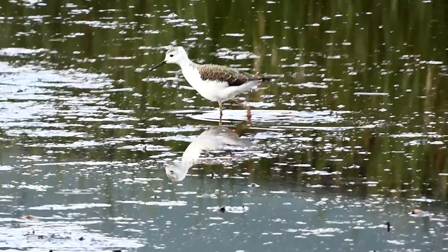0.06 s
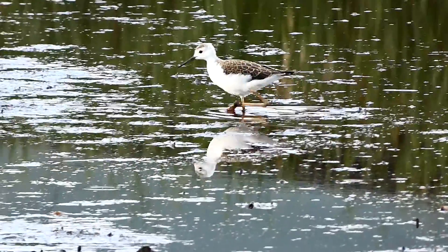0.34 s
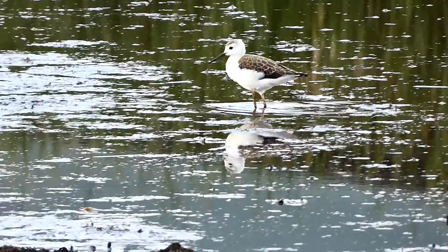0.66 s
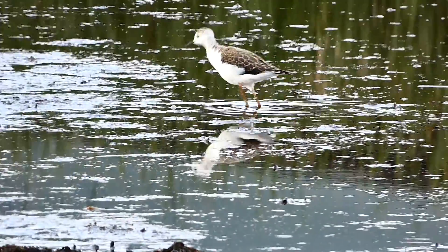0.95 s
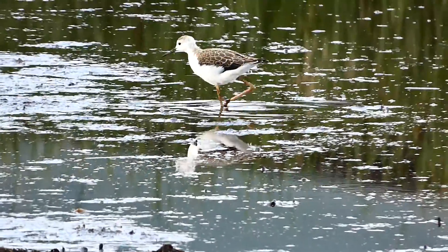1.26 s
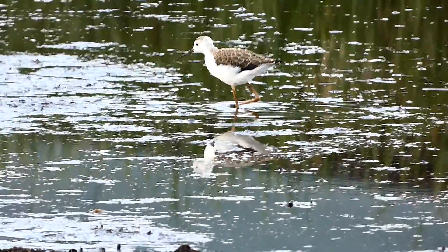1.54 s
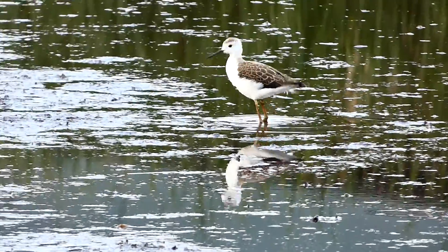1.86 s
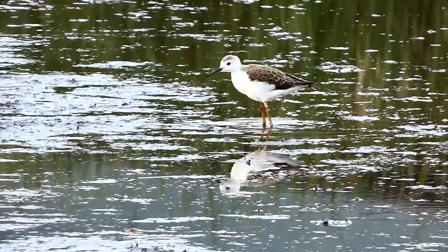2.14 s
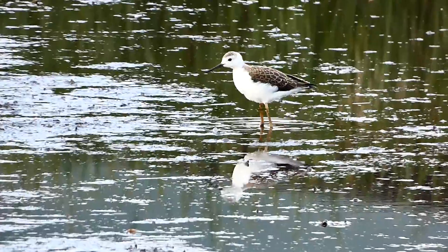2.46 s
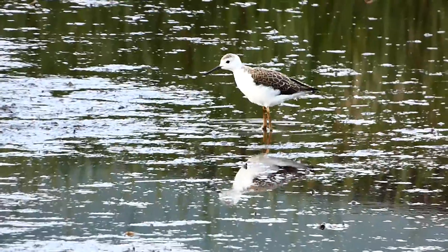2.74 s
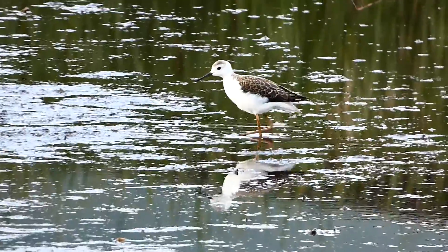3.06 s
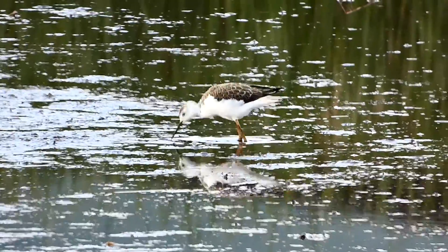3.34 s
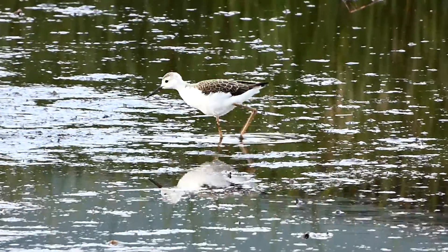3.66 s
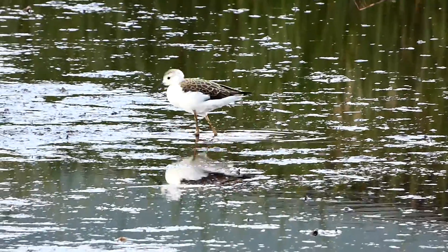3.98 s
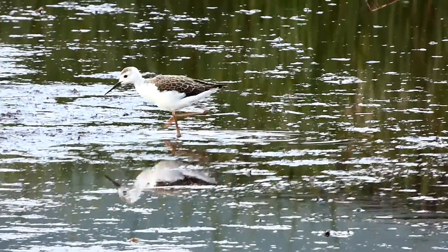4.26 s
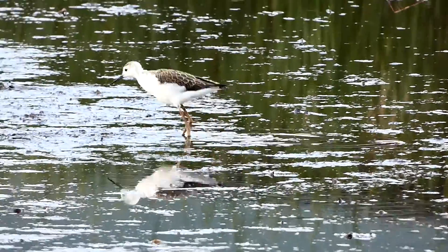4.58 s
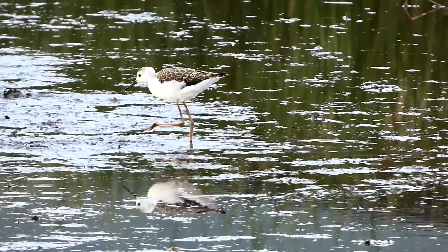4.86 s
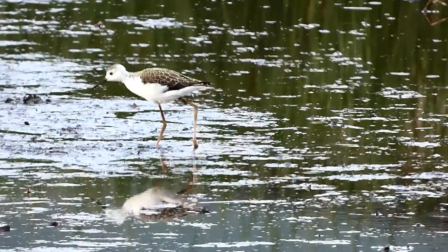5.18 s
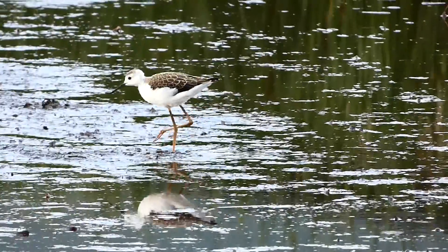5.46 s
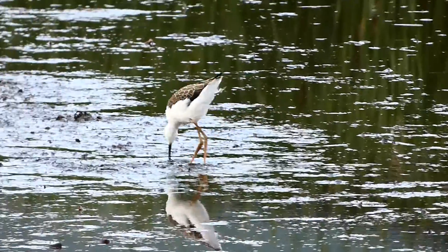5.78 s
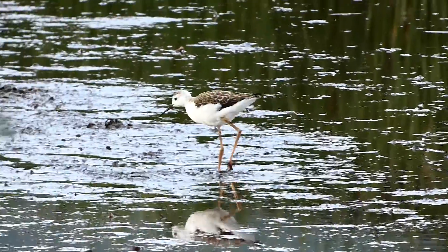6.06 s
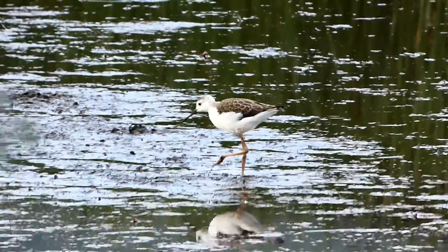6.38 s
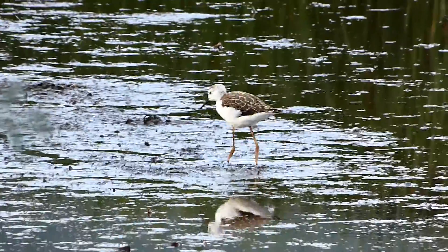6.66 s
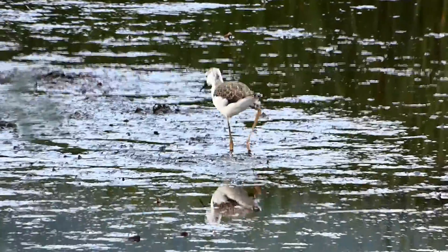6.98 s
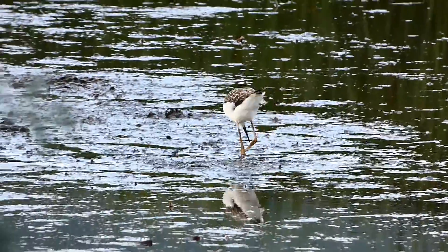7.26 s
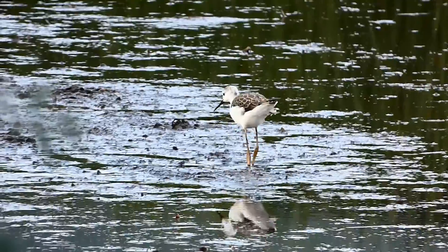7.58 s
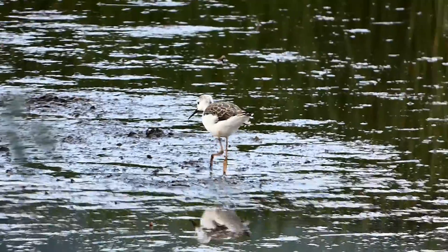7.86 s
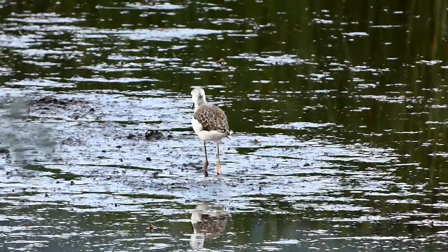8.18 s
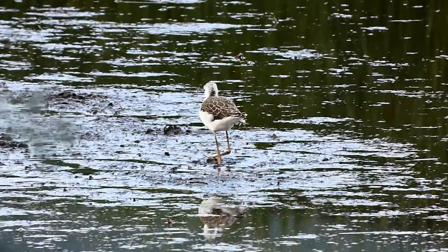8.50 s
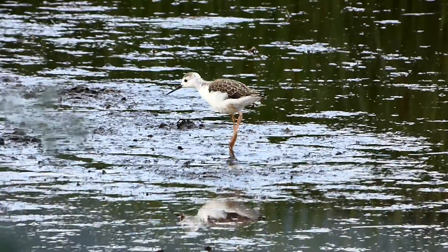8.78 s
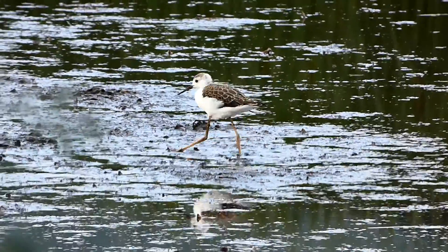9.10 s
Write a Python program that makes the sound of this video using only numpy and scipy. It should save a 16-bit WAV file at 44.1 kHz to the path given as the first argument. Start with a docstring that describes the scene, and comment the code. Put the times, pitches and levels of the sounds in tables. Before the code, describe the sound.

At a marsh pool, wading birds yap close in front of the microphone throughout: short, sharp, arched calls, about two or three a second, some slightly hoarse. From 0.2 to 0.9 seconds one long nasal squeal climbs, holds, wavers and breaks upward into a rasp. The yaps soften around 4 to 5 seconds, then come stronger and more regularly from about 6.4 seconds. Further off, small birds give scattered thin, scratchy chips. A frog some way off gives one brief rattle at 6.3 seconds, then four full, short, rising rattles at about 6.9, 7.6, 8.3 and 8.9 seconds. Behind everything lie a faint, distant croaking chorus, a twittering flock and a steady soft hiss of reeds and high insects. Light wind buffets the microphone with a low rumble, mostly from 3 to 5.5 seconds and after 8 seconds. The reed bank returns a short, soft echo.

```python
"""Stilts yap close in front of the microphone at a marsh pool: short arched calls sung with both sides
of the syrinx at once, and one long squeal. Further off, small birds chip and a frog gives one brief
and four full rattles near the end. Behind them lie a far croaking chorus, a twittering flock and a
hiss of reeds and insects. A little wind buffets the microphone; the reed bank returns a short echo."""
import sys
import numpy as np
from scipy import signal
from scipy.fft import rfft, irfft, next_fast_len
from scipy.io import wavfile
from scipy.ndimage import uniform_filter1d

SR = 44100
rng = np.random.default_rng(int(sys.argv[2]) if len(sys.argv) > 2 else 0)


def waveform_to_disk(signal):
    """Save audio, clipped to [-1, 1], as 16-bit WAV at the path in sys.argv[1]."""
    frames = np.transpose(np.atleast_2d(signal))
    scaled = np.clip(frames, -1, 1) * 32767
    samples = np.round(scaled).astype(np.int16)
    wavfile.write(sys.argv[1], SR, samples)


N = 411894
TIME = np.arange(N) / SR
SIDE = np.array([[1], [-1]])  # opposite in the left and right channels


def undb(db):
    """Decibels to gain."""
    return 10 ** (np.asarray(db) / 20)


def unit(x):
    """Scale to rms 1."""
    return x / np.sqrt(np.mean(x ** 2))


def add(track, start_s, sound):
    """Mix a sound into a track."""
    at = int(start_s * SR) + np.arange(len(sound))
    inside = (at >= 0) & (at < N)
    track[at[inside]] += sound[inside]


def flutter(size, hz):
    """Smooth random motion of spread 1, no faster than about hz."""
    lowpass = signal.butter(3, hz, fs=SR, output="sos")
    return unit(signal.sosfilt(lowpass, rng.standard_normal(size + SR // 20))[-size:])


def drift(per_s):
    """Random levels over the whole scene, joined by straight lines."""
    return np.interp(TIME * per_s, np.arange(1024), rng.standard_normal(1024))


def noise(colour):
    """Noise of rms 1 with a spectrum of (freq_hz, level_db) points."""
    hz, db = np.transpose(colour)
    size = 2 * SR * (N // SR // 2 + 1)
    bins = np.maximum(np.fft.rfftfreq(size, 1 / SR), 1)
    gain = undb(np.interp(np.log(bins), np.log(hz), db))
    return unit(irfft(rfft(rng.standard_normal(size)) * gain)[:N])


def wide_noise(colour, side_db):
    """Noise with a part that is opposite in the two channels."""
    return noise(colour) + undb(side_db) * noise(colour) * SIDE


def flicker(x, depth_db, per_s):
    """Half-octave bands, centred from 1.4 kHz up, each swell and sink on their own."""
    size = next_fast_len(N)
    spectrum, bins = rfft(x, size), np.fft.rfftfreq(size, 1 / SR)
    centres_hz = 1400 * 2 ** np.arange(0, 3.1, .5)
    masks = (np.interp(bins, centres_hz, row) for row in np.eye(len(centres_hz)))
    return sum(irfft(spectrum * mask, size)[:N] * undb(depth_db * drift(per_s)) for mask in masks)


def phase_of(hz):
    """Running phase of a pitch curve."""
    return 2 * np.pi * np.cumsum(hz) / SR


def rasp(phase, rough, width_hz):
    """A tone that gives part of its power to a noisy skirt as it gets rougher."""
    size = len(phase)
    skirt = flutter(size, width_hz) * np.sin(phase) + flutter(size, width_hz) * np.cos(phase)
    return np.sin(phase) * np.sqrt(1 - np.clip(rough, 0, 1) ** 2) + rough * skirt / np.sqrt(2)


def reflections(x, envelope):
    """A sound returned along many random paths whose strength follows an envelope."""
    response = unit(envelope * rng.standard_normal(len(envelope))) / np.sqrt(len(envelope))
    return signal.fftconvolve(x, response)[:N]


def reed_echo(x, reeds_s=0.056, bank_s=0.092, bank_spread_s=0.029, trees_s=0.073):
    """Reeds scatter sound back softly, the far bank returns it once more, trees add a faint tail."""
    t = np.arange(SR * 3 // 4) / SR
    reeds = reflections(x, t * np.exp(-t / reeds_s))
    bank = reflections(x, np.exp(-((t - bank_s) / bank_spread_s) ** 2))
    trees = reflections(x, np.sqrt(t) * np.exp(-t / trees_s))
    return undb(-23) * reeds + undb(-20) * bank + undb(-29) * trees


def through_reeds(x, decay_s, wet_db):
    """A distant sound reaches the microphone straight, then by many paths through the reeds."""
    t = np.arange(SR // 4) / SR
    return x + undb(wet_db) * reflections(x, np.exp(-t / decay_s))


def dull_return(x, gain_db=-13, lag_s=0.104, spread_s=0.025, edge_hz=2100):
    """The reeds behind the frog send its rattle back late and dull."""
    t = np.arange(SR // 5) / SR
    echo = reflections(x, np.exp(-((t - lag_s) / spread_s) ** 2))
    return undb(gain_db) * signal.sosfilt(signal.butter(6, edge_hz, fs=SR, output="sos"), echo)


# spectrum of the reeds and far wildlife: freq_hz, level_db
HISS_COLOUR = [(200, -34), (450, 2), (620, -17), (900, -8.5), (1550, -14.5), (2050, -9.5), (2450, 3.5),
               (3600, 0.5), (4500, -6.5), (6500, -12.5), (7600, -19.5), (9400, -7.5), (12500, -28.5),
               (15500, -30)]
# their level at the microphone: time_s, level_db
HISS_LEVEL = [(0, -41.5), (1, -44.5), (2.5, -45.5), (4, -45.5), (5.5, -46.5), (7, -44.5), (8.8, -46),
              (9.3, -46)]


def reed_hiss():
    """Reeds and far wildlife hiss in the centre; the treble flickers."""
    hiss = flicker(noise(HISS_COLOUR), depth_db=2.6, per_s=24)
    return hiss * undb(np.interp(TIME, *np.transpose(HISS_LEVEL)) + drift(14))


# spectrum of the insect choir: freq_hz, level_db
INSECT_COLOUR = [(6500, -8), (7700, -11), (8500, 0), (9300, 9), (10500, 4.5), (11700, -5), (13500, -8.5),
                 (16000, -24)]


def insects():
    """A high, wavering insect choir all around the microphone."""
    return wide_noise(INSECT_COLOUR, side_db=0) * undb(-61.5 + 2 * drift(24))


# breeze at the microphone: time_s, level_db
WIND_LEVEL = [(0, -93), (.74, -77), (.88, -59.5), (1.06, -91), (2.9, -75), (3.14, -69), (3.22, -56),
              (3.85, -57), (4.3, -61), (4.7, -60.5), (5.5, -62), (6.05, -71.5), (6.8, -62.5), (6.95, -76),
              (7.7, -82), (7.92, -67), (8.33, -52.5), (8.8, -65.5), (8.97, -50), (9.34, -53)]
# spectrum of its rumble: freq_hz, level_db
WIND_COLOUR = [(20, -33), (45, -14), (75, 1.5), (120, 5), (170, -3), (230, -21), (400, -48)]


def wind(buffet_db=5.5, buffets_per_s=21, calm_db=-76):
    """The breeze hits the microphone in quick random buffets; a faint rumble stays when it drops."""
    breeze = undb(np.interp(TIME, *np.transpose(WIND_LEVEL)) + buffet_db * drift(buffets_per_s))
    return wide_noise(WIND_COLOUR, side_db=-6.5) * np.hypot(breeze, undb(calm_db))


# throat bands of the far chorus, scattered between animals: pitch_hz, scatter_share, level_db
CHORUS_BANDS = [(425.3, 0.041, -1), (355.6, 0.052, -16), (807.4, 0.0574, -4.5), (1205, 0.0498, -17),
                (1305, 0.03, -7.5)]
# how loud the far croaking sounds over time, fading at the very end: time_s, level_db
CHORUS_LEVEL = [(0, -54), (1.2, -46.5), (3.7, -55.5), (6.7, -47), (8.8, -51), (9.2, -61.5)]


def far_chorus(count=1500, croak_s=.04, scatter_db=4):
    """Many far croaks overlap into a murmur; each rings the throat bands at its own pitch."""
    out = np.zeros(N)
    starts = rng.random(count) * (N / SR + croak_s) - croak_s
    level_db = np.interp(TIME, *np.transpose(CHORUS_LEVEL)) + 1.5 * drift(13)
    mean_db = level_db.mean()
    for hz, scatter, db in CHORUS_BANDS:
        band = np.zeros(N)
        for start, (pitch, span, loud) in zip(starts, rng.standard_normal((count, 3))):
            u = np.linspace(0, 1, int(SR * croak_s * np.exp(0.27 * span)))
            tone = np.sin(phase_of(hz * (1 + scatter * pitch) * (1 + 0.035 * (.5 - u))))
            add(band, start, undb(scatter_db * loud) * np.sin(np.pi * u) ** 2 * tone)
        follow = min(1, (450 / hz) ** 1.36)  # the upper bands swell less
        out += undb(db + mean_db + follow * (level_db - mean_db)) * unit(band)
    return out


def chip(length_s, pitches_hz, db, rough):
    """A small bird whistles through three pitches; roughness makes it zigzag and turn scratchy."""
    u = np.linspace(0, 1, int(length_s * SR))
    slide_hz = np.polyval(np.polyfit([0, .5, 1], pitches_hz, 2), u)
    hz = slide_hz * (1 + .1 * rough ** 2 * flutter(len(u), 260))
    scratch = unit(undb(3 * rough * flutter(len(u), 120)))
    envelope = np.abs(np.sin(np.pi * u)) ** .75 * scratch
    return undb(db) * envelope * rasp(phase_of(hz), .8 * rough ** 2, width_hz=300)


def far_flock(count=650, thinning_db=5):
    """A far flock twitters at random: quick slurs up and down, most of them faint; it slowly quietens."""
    out = np.zeros(N)
    for when, span, pitch, slope, loud in rng.random((count, 5)):
        hz, glide = 2550 + 1250 * pitch ** 1.5, 0.36 * (slope - .5)
        pitches_hz = hz * np.array([1 - glide, 1.04, 1 + glide])
        add(out, when * N / SR, chip(.012 + .025 * span, pitches_hz, db=10 * loud ** 2, rough=.45))
    return undb(-49.5 - thinning_db * TIME / TIME[-1]) * out


def faint_birds(count=44, low_hz=3300, high_hz=6600, slide=0.156):
    """Fainter small birds throw in quick, thin sweeps, upward or downward, at random moments."""
    out = np.zeros(N)
    for when, span, pitch, way in rng.random((count, 4)):
        hz, glide = low_hz + (high_hz - low_hz) * pitch, slide * np.sign(way - .5)
        pitches_hz = hz * np.array([1 - glide, 1, 1 + glide])
        add(out, when * N / SR, chip(.027 * (.5 + span), pitches_hz, db=-48 - 7 * pitch, rough=.12))
    return out


# small birds beyond the stilts: start_s, length_s, first_hz, last_hz, level_db, roughness
CHIPS = [(-.03, 0.14, 3420, 3016, -33.5, 0.96), (0.092, 0.031, 4900, 6200, -40, 0.4),
         (0.996, .025, 3490, 4540, -43.5, 0), (1.505, 0.044, 5110, 3040, -33, 0.65),
         (1.615, 0.061, 3830, 3440, -34.5, 0.5), (1.685, 0.026, 6200, 4200, -53, .1),
         (1.74, 0.025, 3800, 5870, -44, 0.1), (1.799, 0.0295, 3300, 4300, -44, 0.2),
         (1.831, .025, 4400, 3430, -43, .2), (2.291, .07, 5020, 5770, -45.5, .35),
         (2.436, 0.06, 5480, 3060, -34.5, 0.8), (2.615, 0.07, 3430, 2970, -34, 0.88),
         (2.774, 0.064, 3710, 3060, -30.5, 0.68), (2.862, 0.022, 3500, 4430, -39, 0),
         (3.036, 0.035, 4830, 3140, -37, 0.94), (3.26, 0.021, 4050, 3110, -31.5, 0),
         (3.374, 0.072, 3800, 3020, -34.5, 0.76), (3.624, 0.19, 8350, 8150, -55, 0.3),
         (3.934, 0.12, 5770, 5380, -44, 0.3), (4.217, 0.052, 4020, 3840, -35, 0.6),
         (4.412, .03, 5900, 4700, -46, .4), (4.6, 0.059, 5500, 4370, -43, .3),
         (4.842, 0.023, 3380, 2950, -36, 0.2), (4.902, .03, 6100, 5000, -49, .2),
         (5.068, .016, 5400, 4300, -43, .1), (5.32, 0.046, 7040, 6400, -48, .2),
         (5.462, 0.014, 3770, 2920, -35.5, 0.1), (5.61, .11, 8300, 8300, -52, 0),
         (5.923, 0.041, 3600, 3670, -29.5, 0), (6.136, .065, 7000, 6500, -56, .2),
         (6.209, 0.046, 6130, 5340, -46, 0.44), (6.27, 0.23, 4710, 3420, -36, 0.9),
         (6.388, 0.19, 3930, 3020, -31.5, 0.75), (6.863, 0.028, 2890, 4760, -36, 0.35),
         (7.06, 0.32, 4240, 4290, -49, 0), (7.76, 0.068, 7000, 6700, -49, 0.54),
         (8.693, 0.15, 7890, 6860, -49, 0.35)]


def small_birds(arch=1.025):
    """Chips from the middle distance, each sliding along a slight arch."""
    out = np.zeros(N)
    for start, length, first_hz, last_hz, db, rough in CHIPS:
        middle_hz = arch * (first_hz + last_hz) / 2
        add(out, start, chip(length, [first_hz, middle_hz, last_hz], db, rough))
    return out


# a frog some way off, in front of the reeds: start_s, length_s, level_db, pitch_hz, last_pulse_db
RATTLES = [(6.255, 0.031, -30.5, 1800, -1), (6.912, 0.12, -21, 1900, 2), (7.605, 0.14, -18.5, 2010, -3.5),
           (8.265, 0.139, -22, 1960, 1.5), (8.886, 0.15, -17.5, 2080, -7)]


def frog(pulse_hz=182, rise=0.17, pulse_width_s=0.0004, band_hz=(1620, 2850)):
    """Trains of brief, uneven throat pulses swell and rise in pitch; the vocal sac rings after each."""
    out = np.zeros(N)
    t = np.arange(-SR // 500, SR // 100) / SR
    sac = .2 * np.clip(t / .001, 0, 1) * np.exp(-np.abs(t) / .003) * np.cos(2 * np.pi * 1900 * t)
    window = np.exp(-(t / pulse_width_s) ** 2 / 2)
    for start, length, db, hz, last_db in RATTLES:
        at = start
        for u in np.arange(0, 1, 1 / (pulse_hz * length)):
            pulse = window * np.cos(2 * np.pi * hz * (1 + rise * (u - .5)) * t)
            swell_db = np.interp(u, [0, .25, .55, .7, 1], [-14, -4, 0, -.5, last_db])
            add(out, at, undb(db + swell_db + .8 * rng.standard_normal()) * (pulse + sac))
            # the first pulses come slowly, then the rate settles
            at += (1 + .12 * (1 - u) ** 5 - .02 * u + .011 * rng.standard_normal()) / pulse_hz
    return signal.sosfilt(signal.butter(4, band_hz, "bandpass", fs=SR, output="sos"), out)


# tone colour of the stilts' calls, strongest near 2.5 kHz, dull around 7 kHz: freq_hz, gain_db
CALL_COLOUR = [(900, -8), (1900, -9.5), (2450, 8.5), (2800, 2.5), (3150, 0.5), (3550, 2), (4000, -3),
               (4550, -5.5), (5000, 1), (5700, -1), (6700, -10.5), (7600, -10), (10000, 2.5), (14000, 2)]


def call_colour(hz):
    """Gain that the tone colour of the calls gives a tone at hz."""
    return undb(np.interp(hz, *np.transpose(CALL_COLOUR)))


# one stilt's long squeal, close by: time_s, pitch_hz, relative_level_db, brightness_db
SQUEAL_PATH = [(0.198, 829, -60, -12), (0.232, 968, -50, -6), (0.256, 1058, -40, -1),
               (0.406, 1184, -32.5, -5.5), (0.55, 1197, -34.5, -2.5), (0.661, 1187, -32, -13),
               (0.703, 1127, -32.5, -11.5), (0.73, 1159, -35.5, 1.5), (0.748, 1156, -33, -6),
               (0.772, 1270, -40.5, -3), (0.826, 1307, -36.5, -5), (0.901, 1123, -34.5, -5),
               (0.925, 1090, -53, 2)]
# its harmonics: multiple, level_db
SQUEAL_HARMONICS = [(1, 2), (2, -13), (3, -0.5), (4, -16.5), (5, -15), (6, -8.5), (7, -21), (8, -32),
                    (9, -26), (10, -30)]


def squeal(break_s=.755, gape_hz=4200, gain_db=9):
    """One long nasal note that climbs, holds, wavers, then breaks upward and turns hoarse."""
    times, *columns = np.transpose(SQUEAL_PATH)
    t = np.arange(times[0], times[-1], 1 / SR)
    hz, db, bright_db = (np.interp(t, times, column) for column in columns)
    rough = np.where(t < break_s, .045, .24)
    phase = phase_of(hz * (1 + .0034 * flutter(len(t), 150) + .003 * flutter(len(t), 25)))
    # the bill gapes as the note sets in: a bright resonance that fades as it closes
    gape_db = np.interp(t, [.21, .35], [29, 0])
    voice = 0
    for k, tone_db in SQUEAL_HARMONICS:
        bill_db = gape_db * np.exp(-((k * hz - gape_hz) / 620) ** 2)
        press_db = bright_db * np.log2(k) / 2 + 0.62 * flutter(len(t), 24)
        dull_db = -2 * max(k - 2, 0) * (t > break_s)
        hoarseness = rough * (k if k < 4 else 2.7 * k)
        tone = rasp(k * phase, hoarseness, width_hz=200)
        voice += undb(tone_db + bill_db + press_db + dull_db) * call_colour(k * hz) * tone
    out = np.zeros(N)
    add(out, times[0], voice * undb(db + gain_db))
    return out


# tones of a stilt's two coupled voices: high_multiple, low_multiple, level_db, brassiness_share
YAP_TONES = [(1, 0, 4, 0.017), (2, 0, -15, 0.41), (3, 0, -34, 0.13), (0, 1, 0, 0), (0, 2, -3, 0),
             (0, 3, 1, 0.00062), (0, 4, -12, 0.84), (0, 5, -23, 0.0019), (0, 6, -21, 0.37),
             (1, 1, 3.5, 0.079), (1, -1, -7, 0), (2, -1, -10, 0), (1, 2, -12.5, 0.26), (1, 3, -27, 1),
             (2, 1, -9, 0.28), (1, 4, -33, 0.32), (3, 1, -31, 0.3), (3, 2, -33, 0.22)]
JITTER_SHARE, SHIMMER_DB, WOBBLE_HZ = .022, 5, 170  # pitch and level wobble of a fully rough voice
MIN_CLIMB_S, DROP_S, DROP_SHARE = 0.0433, 0.0328, 0.213  # a short call stops before it has dropped far


def yap(length, high_hz, low_hz, high_db, low_db, rough, brass_db, climb, crack_at, sag, opening_db):
    """Both sides of the syrinx follow one arch and modulate each other into sum and difference tones."""
    u = np.linspace(0, 1, int(length * SR))
    t, size = u * length, len(u)
    top_s = max(MIN_CLIMB_S, length - DROP_S)
    rising = 1 - climb * (1 - t / top_s) ** 2
    falling = 1 - DROP_SHARE * ((t - top_s) / DROP_S) ** 2
    depth = np.interp(low_db - high_db, [-6, -1], [1, 1.7])  # deeper when the low voice leads
    arch = np.where(t < top_s, rising, falling) ** depth
    # a strained call cracks part-way through: the high voice sags, weakens and roughens
    crack = (1 + np.tanh((u - crack_at) / .021)) / 2
    rough = rough + .06 * crack
    droop = sag * crack * u / crack_at
    jitter, shimmer_db = JITTER_SHARE * rough, SHIMMER_DB * rough
    arch *= 1 + jitter * flutter(size, WOBBLE_HZ)
    high = high_hz * arch * (1 + (.0016 + jitter) * flutter(size, WOBBLE_HZ) - droop)
    low = low_hz * arch * (1 + .004 * flutter(size, 300) - .7 * droop)
    # the high voice speaks first and soon saturates; the other tones need more pressure and peak later
    early = np.tanh(1.7 * np.abs(np.sin(np.pi * u ** .98)) ** 1.5)
    early *= undb(-5.5 * crack + (shimmer_db - .27) * flutter(size, WOBBLE_HZ))
    late = np.abs(np.sin(np.pi * u ** 1.145)) ** 1.26
    late *= undb(shimmer_db * flutter(size, WOBBLE_HZ))
    # many calls open as a round whistle; the overtones of the low voice join in halfway
    joining = undb(opening_db * (1 - np.tanh((u - .48) / .035)) / 2)
    both_db = (high_db + low_db) / 2
    # the sum tone is strong, except where it falls into a dip near 4 kHz
    sum_db = both_db + 2.5 - 10 * np.exp(-((high_hz + low_hz - 3985) / 200) ** 2)
    out = 0
    for m, k, db, brassy in YAP_TONES:
        hz = m * high + k * low
        if k == 0:
            voice = undb(high_db) * early
        elif m == 0:
            voice = undb(low_db) * (late if k == 1 else late * joining)
        elif k == 1:
            voice = undb(sum_db if m == 1 else both_db) * np.sqrt(early * late)
        else:
            voice = undb(both_db) * late * joining
        tone = rasp(phase_of(hz), rough, width_hz=330)
        out += undb(db + brassy * brass_db) * call_colour(hz) * voice * tone
    return out


# stilt calls, near and straight ahead: start_s, length_s, high_hz, low_hz, high_db, low_db, roughness,
# brassiness_db, climb_share, crack_at_share (over 1: never), sag_share, opening_overtones_db
YAPS = [(0.116, 0.082, 2840, 1153, -58, -35.5, 0, 12, 0.094, 2, 0, 6),
        (0.488, 0.082, 2495, 1097, -26.5, -31.5, 0.14, 2, .12, 2, 0, -8),
        (0.798, 0.085, 2594, 1125, -24.5, -34.5, 0.082, 3, 0.13, 2, 0, -9),
        (1.147, 0.08, 2800, 1157, -19.5, -30.5, 0.1, -18, 0.092, .42, -.012, -3),
        (1.301, 0.052, 2400, 1070, -33.5, -38.5, 0.26, 25, 0.11, 2, 0, 3),
        (1.535, 0.084, 2404, 1038, -28.5, -40.5, 0.15, 14, 0.11, 2, 0, 3),
        (1.959, 0.087, 2410, 1085, -29, -35.5, 0.15, 14, 0.13, 2, 0, -5),
        (2.351, 0.082, 3000, 1214, -30, -30.5, 0.28, -2, 0.081, .45, .065, 2.5),
        (2.681, 0.097, 2290, 976, -30.5, -39.5, 0.21, 15.5, 0.11, 2, 0, 5.5),
        (3.11, 0.083, 2740, 1173, -22.5, -32, 0.13, -18, 0.11, .73, .04, 3),
        (3.541, 0.092, 1863, 945, -28, -40.5, 0.25, 11, 0.046, .45, .02, 2),
        (4.073, 0.074, 3221, 1073, -54, -37, 0.19, 22, 0.07, 2, 0, 0.5),
        (4.131, 0.045, 2480, 1062, -38, -33.5, 0.33, 20, 0.076, .4, .02, -2),
        (4.642, 0.074, 3257, 1086, -41, -37, 0.14, 7, 0.14, 2, 0, -3),
        (5.133, 0.081, 2483, 1070, -32.5, -34.5, 0.2, 16.5, 0.063, .72, .03, 5),
        (5.271, 0.052, 2437, 1070, -35.5, -38.5, 0.41, 17.5, 0.11, .65, .03, 2),
        (5.722, 0.077, 2673, 1096, -28.5, -32.5, 0.1, 9, 0.062, .75, .02, 2),
        (6.061, 0.084, 3070, 1204, -38, -28, 0.0053, -19, 0.1, .55, .03, -0.5),
        (6.397, 0.08, 2787, 1164, -22.5, -29.5, 0.13, -25, 0.16, .74, 0, -7),
        (6.677, 0.086, 2490, 1114, -25.5, -33, 0.03, 2, 0.13, 2, 0, -18),
        (6.795, 0.059, 2676, 1203, -24.5, -27.5, 0.1, 10, 0.072, 2, 0, -26),
        (6.953, 0.088, 2628, 1156, -25, -31.5, 0.074, -9, 0.13, 2, 0, -17),
        (7.223, 0.089, 2770, 1188, -20.5, -31.5, 0.081, -13, 0.12, .75, 0, -2),
        (7.52, 0.088, 2835, 1205, -21, -31, 0.11, -4, 0.14, .54, -.012, -5),
        (7.818, 0.09, 2718, 1170, -22, -30, 0.11, 7, 0.16, 2, 0, -6),
        (8.124, 0.094, 2842, 1202, -21, -30, 0.2, 5.5, 0.13, .52, .01, -18),
        (8.457, 0.094, 2860, 1205, -21.5, -34, 0.16, 8, 0.14, .5, .012, -4),
        (8.793, 0.09, 2840, 1188, -20.5, -27, 0.16, 11, 0.22, .46, .01, -7),
        (9.122, 0.084, 2790, 1198, -27, -32, 0.11, -9, 0.11, .36, 0, 1)]


def stilts(air_db=-30, hoarse_db=-11):
    """The short calls, each with a trace of air noise that grows with its roughness."""
    voices, airflow = np.zeros(N), np.zeros(N)
    for start, length, high_hz, low_hz, high_db, low_db, rough, *manner in YAPS:
        voice = yap(length, high_hz, low_hz, high_db, low_db, rough, *manner)
        add(voices, start, voice)
        add(airflow, start, voice * (undb(air_db) + undb(hoarse_db) * rough))
    effort = np.sqrt(np.abs(uniform_filter1d(airflow ** 2, SR // 200)))
    breath = noise([(350, -40), (700, -17), (1200, -0.5), (3000, 1.0), (6000, 1.5), (7600, -22),
                    (10500, -6), (12500, -19), (15000, -26)])
    return voices + effort * breath


def scene():
    """From the pool: stilts near and straight ahead, the frog and small birds further off and wetter."""
    twitter = through_reeds(small_birds(), decay_s=.02, wet_db=-8) + faint_birds()
    twitter += through_reeds(far_flock(), decay_s=.025, wet_db=-8)
    waders = stilts() + squeal()
    rattle = frog()
    rattle = through_reeds(rattle, decay_s=.05, wet_db=-17) + dull_return(rattle)
    calls = waders + rattle + twitter
    width = undb(-19) * far_chorus() + undb(-17) * far_flock() + undb(-20) * reed_echo(calls)
    centre = calls + reed_echo(calls) + far_chorus() + reed_hiss()
    return centre + insects() + wind() + width * SIDE


def record(dry, top_hz=15600):
    """The camera cuts the top of the treble."""
    return signal.sosfilt(signal.ellip(10, .2, 80, top_hz, fs=SR, output="sos"), dry)


dry = scene()
out = record(dry)
waveform_to_disk(out)
```